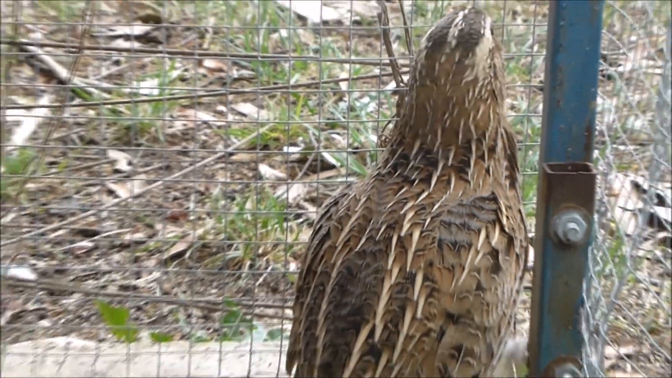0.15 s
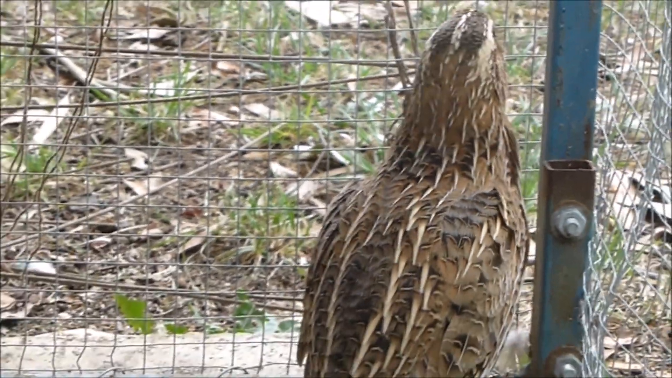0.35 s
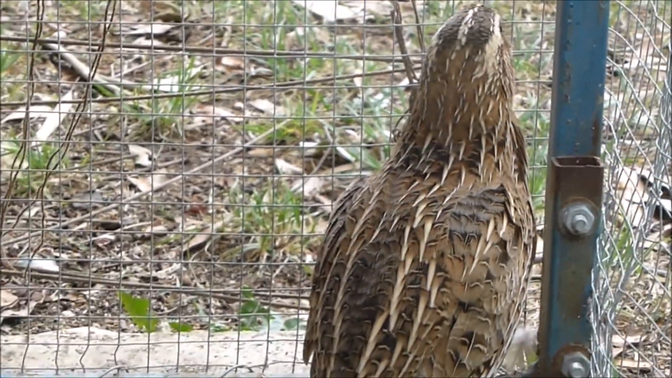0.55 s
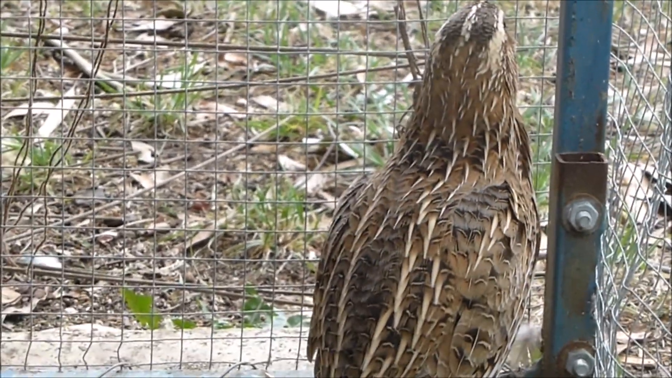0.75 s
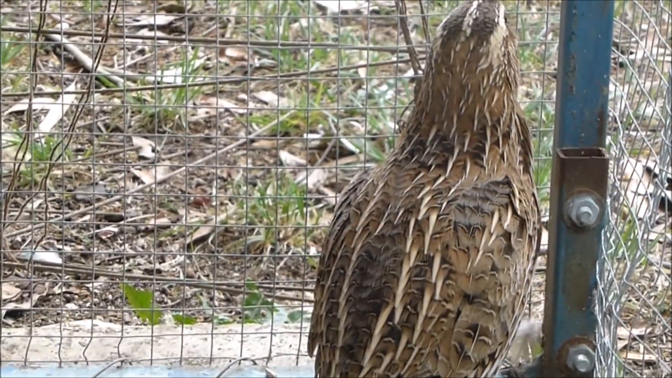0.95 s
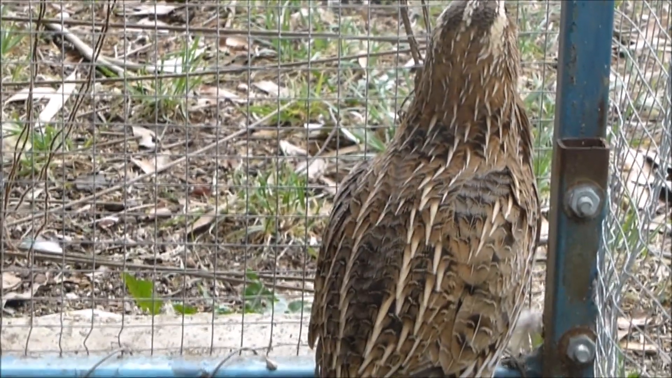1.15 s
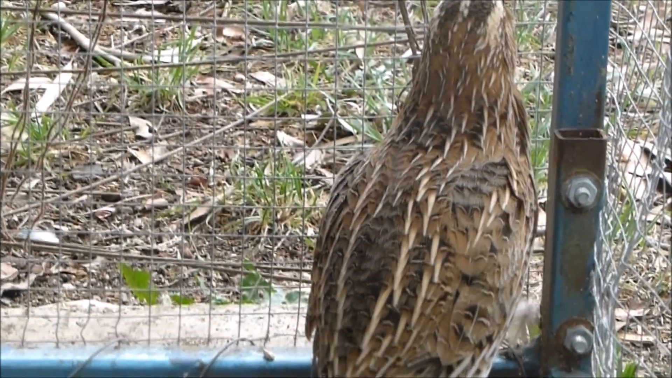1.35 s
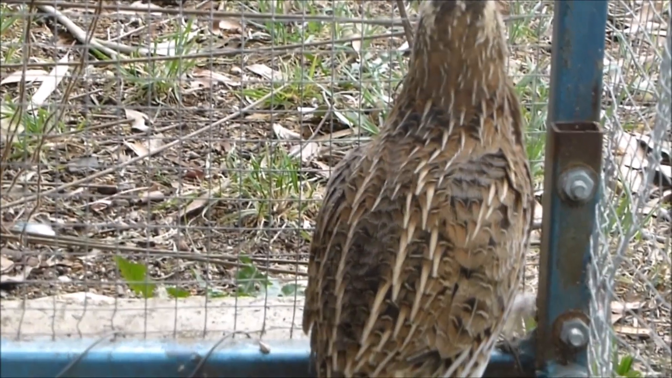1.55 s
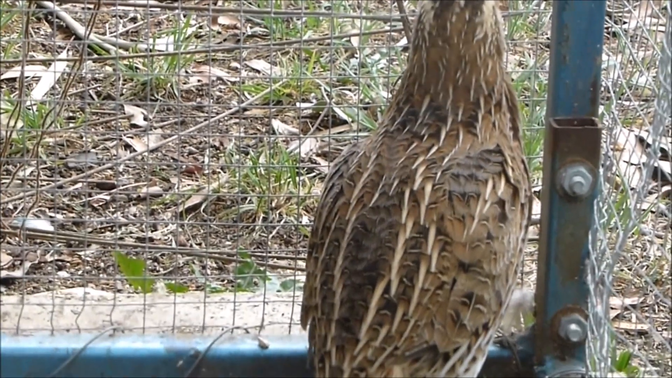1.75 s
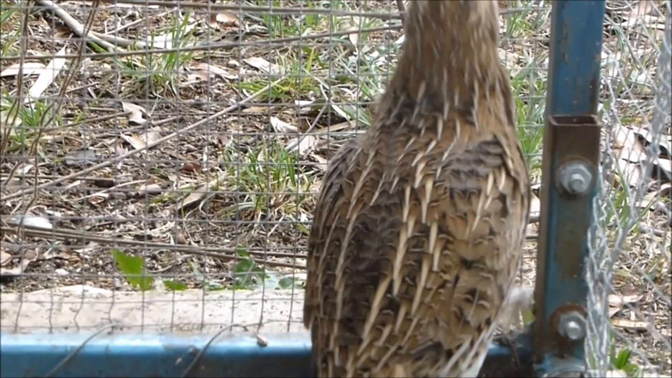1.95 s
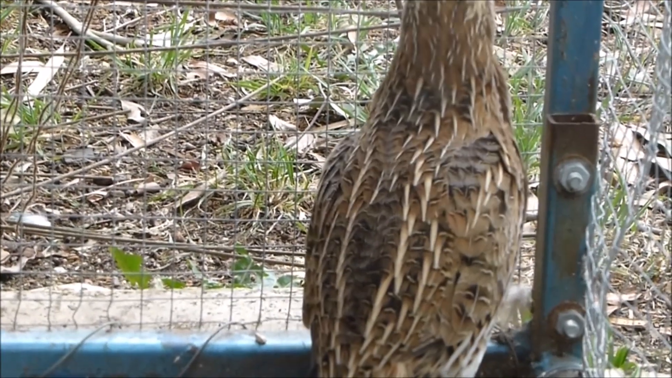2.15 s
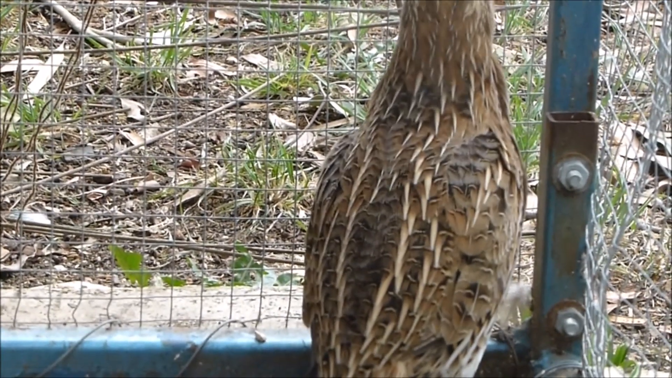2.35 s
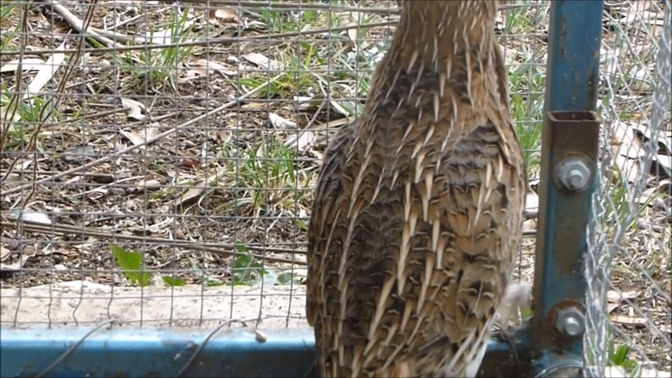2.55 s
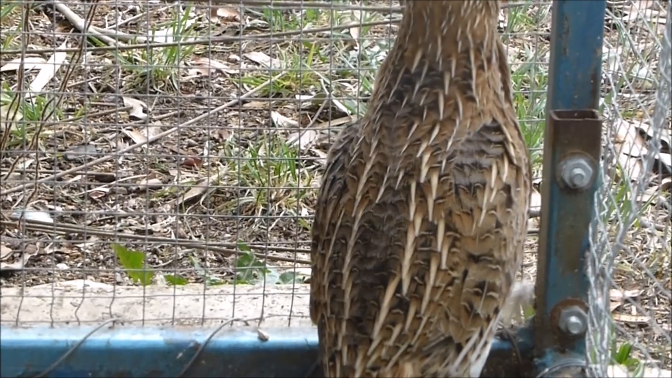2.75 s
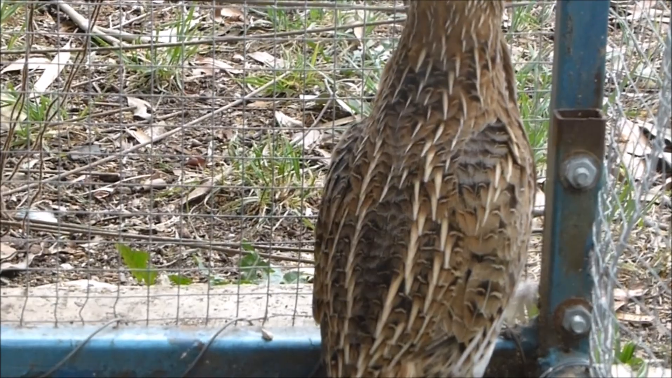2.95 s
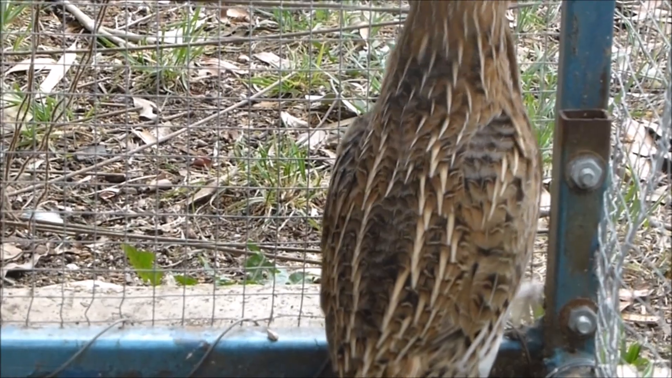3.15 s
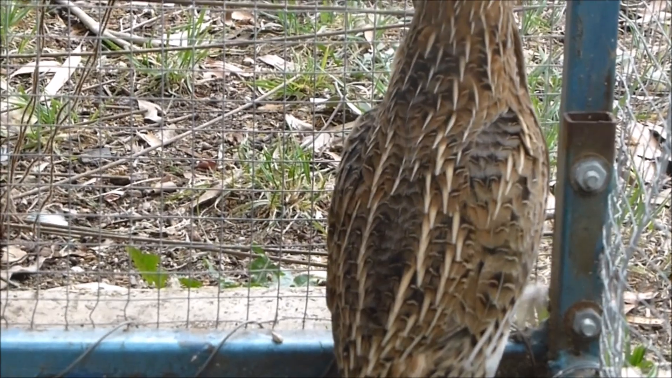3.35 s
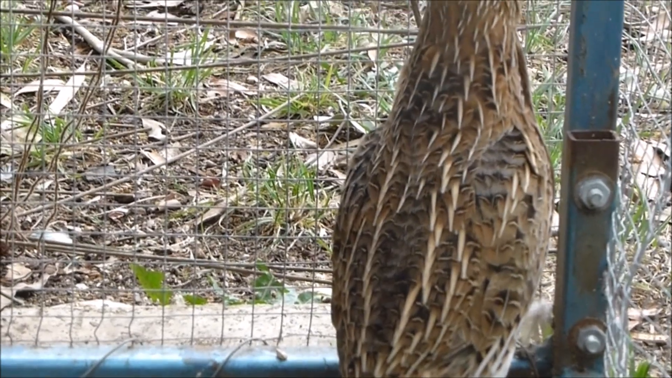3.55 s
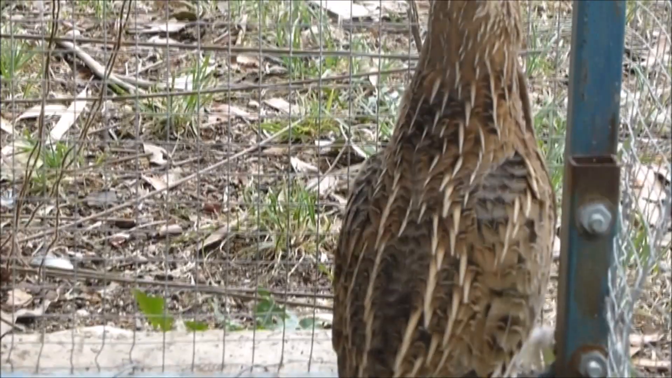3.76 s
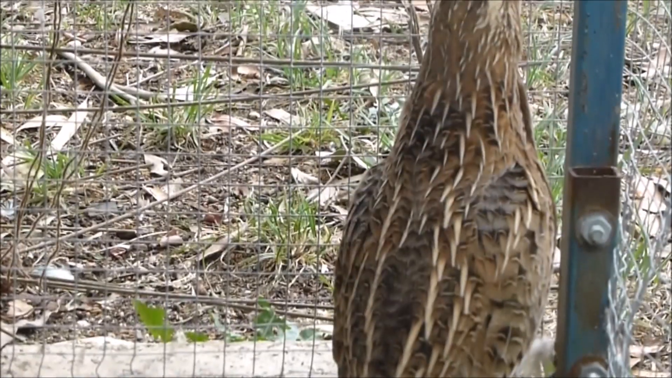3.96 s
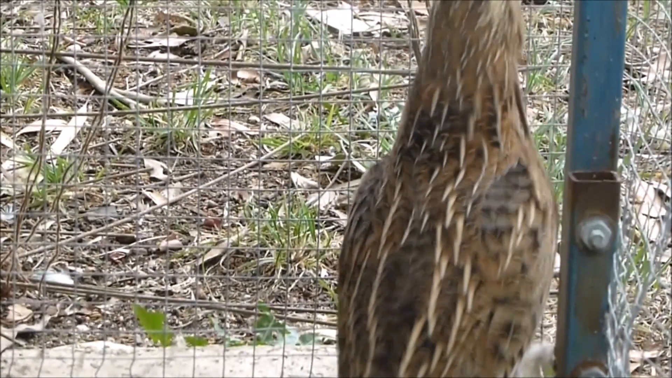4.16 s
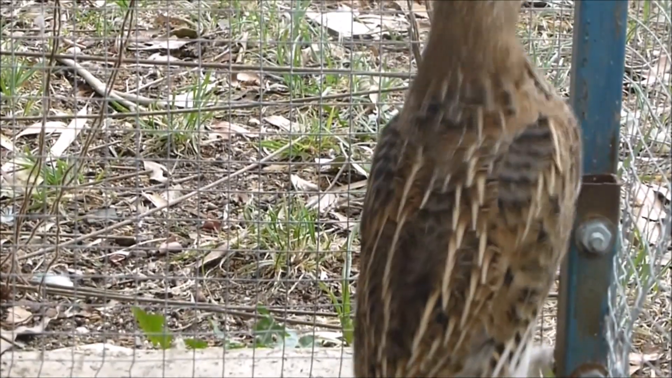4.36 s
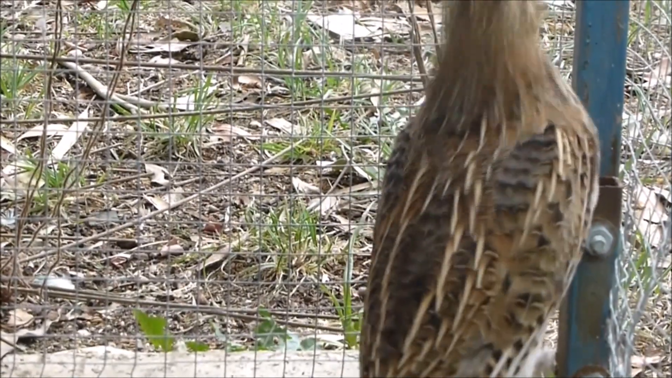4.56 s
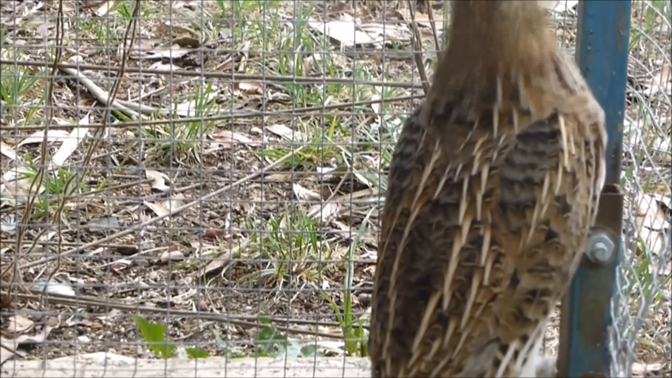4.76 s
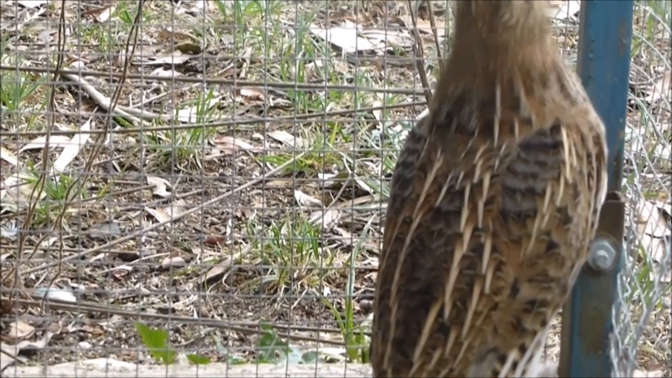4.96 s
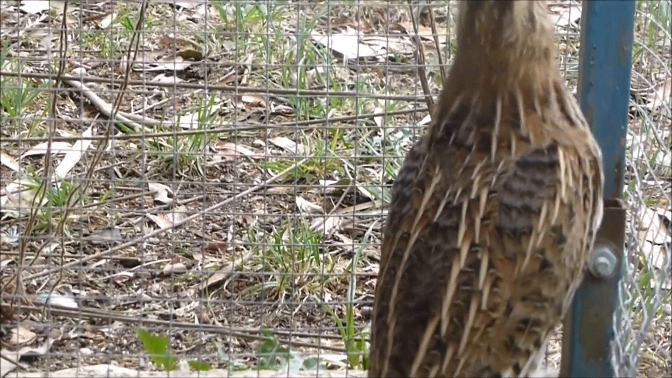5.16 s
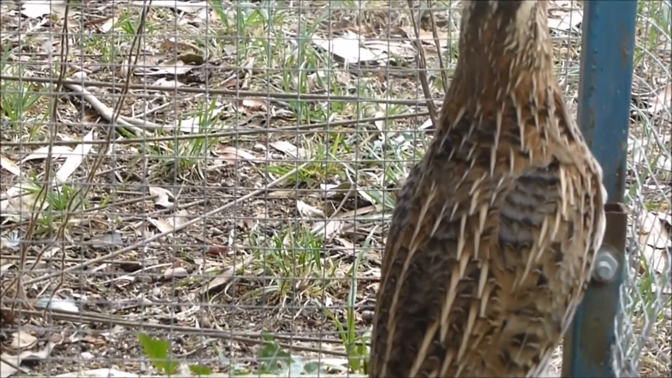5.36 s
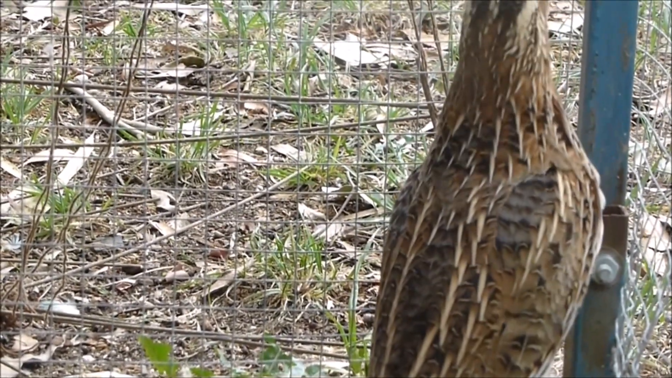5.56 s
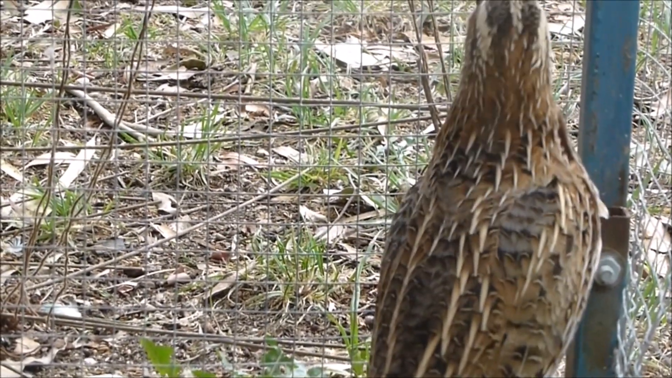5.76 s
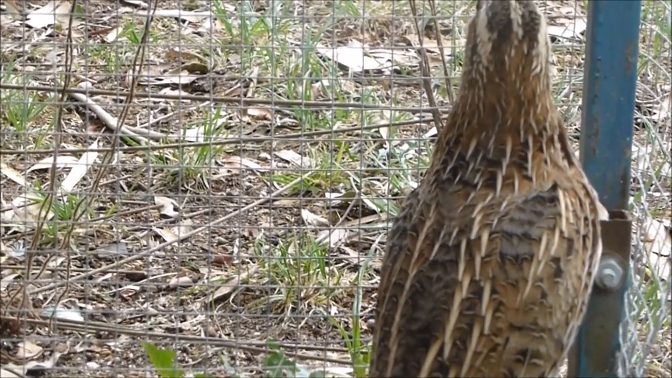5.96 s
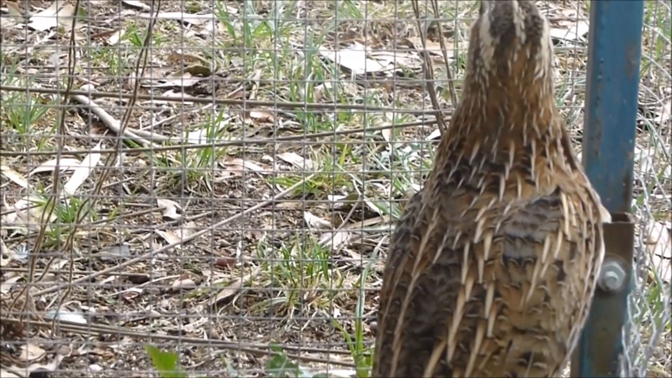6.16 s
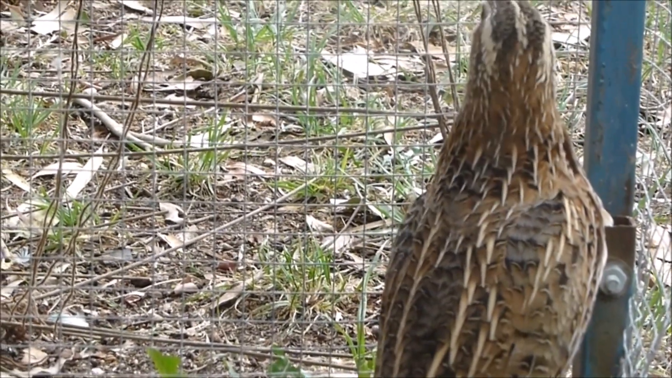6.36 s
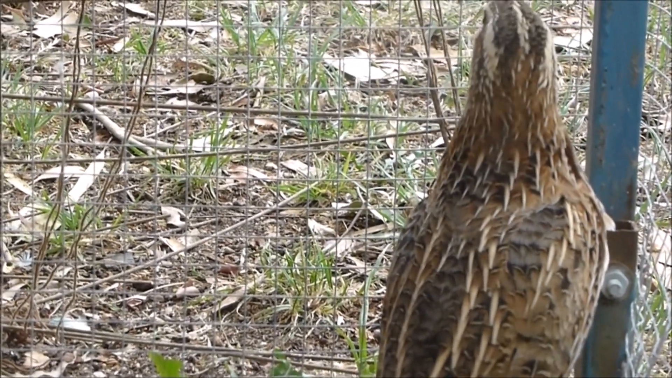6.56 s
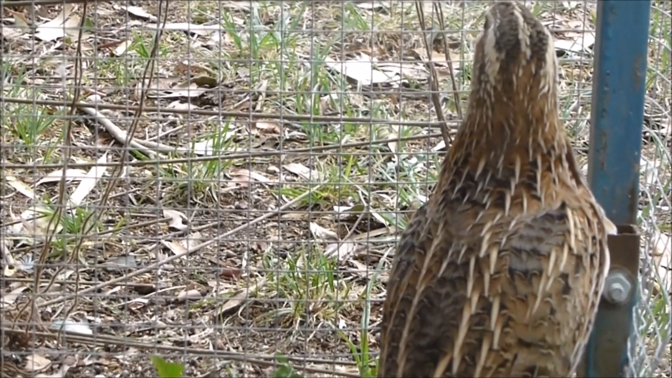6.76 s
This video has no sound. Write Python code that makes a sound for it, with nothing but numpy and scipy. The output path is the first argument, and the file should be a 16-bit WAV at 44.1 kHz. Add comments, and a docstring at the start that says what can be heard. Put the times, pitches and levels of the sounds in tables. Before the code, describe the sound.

A thin squeaky whistle from a nearby quail, slightly left, opens the scene. Small taps and clicks of wire and litter dot a calm yard with distant chirps and soft air noise. Past the middle, the bird gives a short croaky whistled note, then a harsh trilling crow full of rattle and hiss. Close reflections tangle the call; the background drops, then slowly returns, with a final knock.

```python
"""An outdoor wire pen, a male quail close to the microphone: a short high squeal, later a sharp note and a loud crow.
In the crow a whistle swings up and down, mostly 21 to 25 times a second, while slack membranes rattle against it.
Light taps, ticks and bumps sound in the pen as decaying tones and noise; far birds are narrow bands of noise.
Rumble and leaf hiss are shaped noise. Gain control turns everything down after loud passages, then recovers."""
import sys
import numpy as np
from scipy import signal
from scipy.fft import rfft, irfft
from scipy.io import wavfile
from scipy.ndimage import uniform_filter1d, minimum_filter1d, map_coordinates

SR = 44100
rng = np.random.default_rng(int(sys.argv[2]) if len(sys.argv) > 2 else 0)


def store_pcm(level_fs):
    """Save levels as 16-bit WAV."""
    pcm = np.round(np.clip(level_fs, -1, 1) * 32767).astype(np.int16)
    wavfile.write(sys.argv[1], SR, np.atleast_2d(pcm).T)


N = 299880


def amp(db):
    """Decibels to gain."""
    return 10 ** (np.asarray(db) / 20)


def unit(x):
    """Scale to rms 1."""
    return x / np.sqrt(np.mean(x ** 2) + 1e-20)


def along(points, hz):
    """(Hz, value) points read on a log frequency axis."""
    point_hz, value = np.transpose(points)
    return np.interp(np.log(hz + 1), np.log(point_hz + 1), value)


def curves(rows):
    """Sample times over the rows' span, then each column at those times."""
    s, *columns = np.transpose(rows)
    t = np.arange(round(s[0] * SR), round(s[-1] * SR)) / SR
    return [t] + [np.interp(t, s, column) for column in columns]


def ramp(t, length):
    """Rises from 0 to 1 over length seconds."""
    return np.clip(t / length, 0, 1)


def add(track, s, x):
    """Mix x into the track from time s on."""
    part = track[max(round(s * SR), 0):][:len(x)]
    part += x[:len(part)]


def placed(x, left_db):
    """Stereo pair, louder on the left by left_db."""
    return x * amp([[left_db / 2], [-left_db / 2]])


def wobble(rate, size):
    """A smooth random curve, rate knots a second."""
    knots = rng.standard_normal(size=4096)
    return map_coordinates(knots, [np.arange(size) * rate / SR], mode="wrap")


def colour(x, points, size=4096):
    """Causal minimum-phase filter with the gain of the (Hz, dB) points."""
    gain = amp(along(points, np.fft.rfftfreq(size, 1 / SR)))
    cepstrum = irfft(np.log(gain))
    fold = 1 + np.sign(size / 2 - np.arange(size))  # moves the cepstrum to positive times
    fold[0] = 1
    response = irfft(np.exp(rfft(cepstrum * fold)))
    return signal.fftconvolve(x, response)[:len(x)]


def band(size, lo_hz, hi_hz):
    """Noise of rms 1 between two soft edges."""
    edges = np.clip([lo_hz, hi_hz], 20, SR / 2 - 20)
    sos = signal.butter(2, edges, "band", fs=SR, output="sos")
    return unit(signal.sosfilt(sos, rng.standard_normal(size)))


def above(x, low_hz, order):
    """High-pass filter."""
    return signal.sosfilt(signal.butter(order, low_hz, "high", fs=SR, output="sos"), x)


# Likeness of the air at left and right. Each row: frequency in Hz, correlation from 0 to 1.
ALIKE = [(30, 0.59), (80, 0.86), (500, 0.78), (1500, 0.073), (5000, 0.3), (15000, 0.55)]


def air(spectrum, patchy_db):
    """Stereo noise of rms 1 with patches of random gain in time and frequency."""
    z = signal.stft(rng.standard_normal((2, N)), nperseg=2048)[2]
    hz = np.linspace(0, SR / 2, z.shape[1])
    patches = uniform_filter1d(rng.standard_normal(z.shape[1:]), size=16, axis=0)
    patches = uniform_filter1d(patches, size=5, axis=1)
    turn = np.arccos(np.clip(along(ALIKE, hz), -1, 1)) / 2  # splits the power between mid and side
    shape = amp(along(spectrum, hz)) * np.array([np.cos(turn), np.sin(turn)])
    z = z * shape[..., None] * amp(patchy_db * unit(patches))
    mid, side = signal.istft(z)[1][:, :N]
    return unit(np.array([mid + side, mid - side]))


# The open air over time. Each row: time in seconds, rumble and leaf hiss in relative dB.
OUTDOORS = [(0, -59, -59.5), (.45, -55.5, -62), (.95, -59, -64), (2.3, -58, -63), (3.601, -55.5, -60.5),
            (4.4, -57.5, -60.5), (5.6, -58.5, -64), (6.8, -59.5, -63)]
# Spectrum of the distant rumble. Each row: frequency in Hz, relative density in dB per Hz.
RUMBLE = [(15, -57.5), (25, -31.5), (54, -25.5), (90, -10.5), (338, -1.5), (383, -6), (461, 0.5),
          (522, -7.5), (1030, -7), (1150, -12), (2570, -20), (2850, -20), (3500, -30), (4550, -65),
          (7700, -120)]
# Spectrum of the leaf hiss. Each row: frequency in Hz, relative density in dB per Hz.
LEAVES = [(1760, -31), (3000, -5), (3240, -10), (4050, -1.5), (6270, -2), (9920, -3.5), (14000, -10),
          (15800, -19)]


def outdoors(rumble_db=4.0, leaves_db=2):
    """Distant rumble and a faint hiss of leaves: broad noise whose two levels drift slowly."""
    s, low_db, high_db = np.transpose(OUTDOORS)
    t = np.arange(N) / SR
    rumble = amp(np.interp(t, s, low_db) + rumble_db) * air(RUMBLE, patchy_db=2.0)
    leaves = amp(np.interp(t, s, high_db) + leaves_db) * air(LEAVES, patchy_db=1.0)
    return rumble + leaves


# Small birds far off. Each row: start in seconds, nominal length in seconds, pitch in Hz, level in dB.
FAR_BIRDS = [(.03, .09, 4100, -57), (1.13, .18, 2870, -65), (1.67, .04, 4000, -68), (1.9, .4, 2780, -71),
             (2.96, .2, 3380, -55), (2.92, .25, 2650, -62), (5.66, .2, 3050, -65), (6.03, .16, 3050, -65),
             (6.44, .15, 3570, -57), (6.42, .18, 2650, -66)]


def far_birds(width=0.029, t60=0.57):
    """Distant whistles, smeared into narrow bands that linger among the trees."""
    out, t = np.zeros(N), np.arange(SR // 2) / SR
    for s, length, hz, db in FAR_BIRDS:
        rise = np.minimum(1, 3 * t / length)
        fall = amp(-60 * np.maximum(t - length / 2, 0) / t60)
        add(out, s, amp(db) * rise * fall * band(len(t), hz * (1 - width), hz * (1 + width)))
    return out


# How long the yard rings. Each row: frequency in Hz, time to fall by 60 dB in seconds.
YARD = [(300, .45), (1600, .38), (3000, .44), (6000, .22), (14000, .15)]


def yard(x, near_db=-9.5, far_db=-22, near_t60=0.1):
    """Quick reflections from ground and pen, then a weak tail from the yard, both as decaying noise."""
    hz, t, z = signal.stft(rng.standard_normal((2, SR // 2)), SR, nperseg=256)
    tail = signal.istft(z * amp(-60 * t / along(YARD, hz)[:, None]))[1]
    t = np.arange(tail.shape[1]) / SR
    near = rng.standard_normal(tail.shape) * amp(-60 * t / near_t60) * (t > .002)
    answer = amp(near_db) * near / np.linalg.norm(near[0])
    answer = answer + amp(far_db) * tail / np.linalg.norm(tail[0])
    return signal.fftconvolve(x, answer, axes=1)[:, :N]


# Soft knocks in the pen. Each row: start in seconds, level in dB, pitch in Hz,
# time to fall by 60 dB in seconds, click in dB relative to the knock.
BUMPS = [(.266, -36, 150, .04, -40), (.348, -42, 400, .2, -30), (1.402, -38, 500, .1, -25),
         (3.738, -47, 130, .08, -40), (6.776, -26, 240, .03, -5)]


def bumps(low_hz=100):
    """Soft, well damped knocks, some with a click at the contact."""
    out, t = np.zeros(N), np.arange(SR // 4) / SR
    for s, db, hz, t60, click_db in BUMPS:
        thud = amp(-60 * t / t60) * np.sin(2 * np.pi * hz * t + .8 * wobble(150, len(t)))
        thud = thud * (1 - np.exp(-t / 0.00009))
        click = amp(click_db - 60 * t / 0.0035) * band(len(t), 240, 7700)
        add(out, s, amp(db) * (thud + click))
    return above(out, low_hz, order=2)


# Ticks of wire and dry litter. Each row: start in seconds, relative level in dB, nominal centre in Hz.
TICKS = [(0.4744, -49, 3300), (0.652, -43, 4720), (0.6998, -52, 5500), (0.8844, -45, 5500),
         (1.397, -44.5, 7960), (2.502, -46, 4900), (3.483, -38, 5500), (3.5079, -37, 9400),
         (3.977, -44.5, 7560), (4.556, -34, 4240)]


def ticks(tick_db=-6.0, t60=0.039):
    """Tiny dry clicks: short bands of noise that die at once."""
    out, t = np.zeros(N), np.arange(SR // 10) / SR
    for s, db, hz in TICKS:
        add(out, s, amp(db + tick_db - 60 * t / t60) * band(len(t), hz * 0.76, hz * 1.5))
    return out


# Taps on the pen. Each row: start in seconds, snap and ring of the frame in relative dB.
TAPS = [(2.723, -37.5, -45), (3.422, -32, -43), (4.1029, -35.5, -42)]
# Modes of the pen's frame. Each row: frequency in Hz, relative level in dB, time to fall by 60 dB in seconds.
FRAME = [(370, -4, 0.35), (1000, 3.5, 0.26), (1110, -0.5, .15), (1825, -18, 0.13), (2380, -31.5, .15)]


def taps(snap_db=-8, ring_db=1, snap_t60=0.1):
    """Each tap snaps and leaves the modes of the frame ringing briefly."""
    out, t = np.zeros(N), np.arange(SR // 3) / SR
    for s, db, frame_db in TAPS:
        ring = np.zeros(len(t))
        for hz, level, t60 in FRAME:
            ring += amp(level - 60 * t / t60) * np.sin(2 * np.pi * hz * t + 0.68 * wobble(160, len(t)))
        ring = ring * (1 - np.exp(-t / 0.0063))  # the ring builds up softly
        snap = amp(db + snap_db - 60 * t / snap_t60) * band(len(t), 1800, 13000)
        add(out, s, snap + amp(frame_db + ring_db) * ring)
    return out


# Reflections from floor, post and sides of the pen. Each row: delay in seconds, relative gain.
ECHOES = [(.00173, .26), (.00205, -.24), (.00298, .18), (.0063, .15), (.015, .17)]


def pen(x, strength):
    """Close surfaces repeat the call a few milliseconds late, so that its sweeps tangle and beat."""
    out = x.copy()
    for delay, gain in ECHOES:
        add(out, delay, strength * gain * x)
    return out


def syrinx(pitch, rough, overtones, flap_hz, depth, jitter):
    """A whistle; when rough, a slower uneven flapping chops it and its pitch shakes at random."""
    n = len(pitch)
    flap = np.sin(2 * np.pi * np.cumsum(flap_hz * (1 + .3 * wobble(300, n))) / SR)
    phase = 2 * np.pi * np.cumsum(pitch * (1 + jitter * rough * wobble(1100, n))) / SR
    chop = (1 + depth * rough * flap) / np.sqrt(1 + (depth * rough) ** 2 / 2)  # keeps the mean power
    return chop * unit(sum(amp(db) * np.sin(multiple * phase) for multiple, db in overtones))


def note(t, pitch, db, rough, overtones, air, air_db, flap_hz, depth, jitter):
    """One note of the quail, with air rushing past the beak, more of it when rough."""
    rush = amp(air_db) * np.sqrt(np.abs(rough)) * unit(colour(rng.standard_normal(len(t)), air))
    fade = np.minimum(1, np.minimum(t - t[0], t[-1] - t) / 0.0016)
    voice = syrinx(pitch, rough, overtones, flap_hz, depth, jitter)
    out = np.zeros(N)
    add(out, t[0], fade * amp(db) * (voice + rush))
    return out


# The high squeal. Each row: time in seconds, pitch before the cracks in Hz, relative level in dB,
# roughness from 0 to 1.
SQUEAL = [(.179, 2850, -50, 0.04), (.195, 2920, -28, 0.06), (.243, 2810, -29, 0.06),
          (.262, 2850, -30.5, 0.53), (.281, 2850, -32, 0), (.295, 2800, -32.5, 0.7), (.321, 2917, -26.5, 0),
          (.346, 3075, -22.5, 0.27), (.366, 3060, -44, 0)]
# Where the squeal cracks upward and sinks back. Each row: start in seconds, length in seconds.
CRACKS = [(.216, .025), (0.253, .042)]
# Overtones of the squeal. Each row: multiple of the pitch, relative level in dB.
SQUEAL_TONE = [(1, 2), (2, -14), (3, -19.5), (4, -33), (5, -41.5)]
# Air at the beak in the squeal. Each row: frequency in Hz, relative gain in dB.
SQUEAL_AIR = [(1000, -44), (2100, 5), (3500, 16), (4600, 0.5), (6500, -4.5), (9500, 1), (15000, -31)]


def squeal():
    """A thin whistle that cracks upward twice and swells near its end."""
    crack_hz, crack_db, crack_rise_s = 619, 3.5, 0.0026  # how far, how much louder, how fast
    t, pitch, db, rough = curves(SQUEAL)
    lift = sum(ramp(t - s, crack_rise_s) * (1 - ramp(t - s, length) ** 3) for s, length in CRACKS)
    return note(t, pitch + crack_hz * lift, db + crack_db * lift, rough, SQUEAL_TONE, SQUEAL_AIR,
                air_db=-11.5, flap_hz=860, depth=0.7, jitter=0.15)


# Soft gliding tones around the crow; the first is the sharp note ringing on, the others are faint whines.
# Each row: start in seconds, length in seconds, first and last pitch in Hz, relative level in dB,
# roughness from 0 to 1.
GLIDES = [(4.48, 0.088, 1610, 1543, -31.5, 0.33), (4.569, 0.051, 1450, 1532, -24.5, 0.09),
          (4.614, 0.08, 2250, 2420, -35, 0.39), (5.365, 0.036, 3110, 3260, -25.5, .08),
          (5.388, 0.062, 2328, 2810, -31.5, 0.5), (5.454, 0.036, 1810, 1760, -40, 0.2),
          (5.49, .08, 1356, 1634, -36, 0.31)]
# Overtones of the gliding tones. Each row: multiple of the pitch, relative level in dB.
GLIDE_TONE = [(1, 8), (2, -8), (3, -13), (4, -25), (5, -26.5)]
# Air at the beak in the gliding tones and the sharp note. Each row: frequency in Hz, relative gain in dB.
SHARP_HISS = [(600, -47.5), (1100, 7), (2800, 3.5), (3600, -8.5), (4600, -19.5), (6000, -5.5), (7400, -1.5),
              (8800, -15), (15000, -28)]


def glides():
    """Soft gliding tones around the crow: first the sharp note ringing on, then faint whines."""
    edge_s, edge_db, sag_db_per_s = 0.036, 12, 54  # each fades in and out, and sags throughout
    out = np.zeros(N)
    for s, length, first_hz, last_hz, db, rough in GLIDES:
        t = np.arange(round(length * SR)) / SR
        edge = ramp(np.minimum(t, length - t), edge_s) - 1
        level = db - sag_db_per_s * t + edge_db * edge
        pitch = first_hz + (last_hz - first_hz) * t / length
        out += note(s + t, pitch, level, rough, GLIDE_TONE, SHARP_HISS,
                    air_db=-8.0, flap_hz=371, depth=0.98, jitter=0.11)
    return out


# Overtones of the sharp note. Each row: multiple of the pitch, relative level in dB.
SHARP_TONE = [(1, 3), (2, -33), (3, -39), (4, -27.5), (5, -29)]


def sharp():
    """One push of air: a croak tightens into a clean tone at its height, then slackens as it fades."""
    start_s, attack_s, hold_s, release_s = 4.399, .014, .023, .084
    hold_db, range_db = -5.5, 37  # relative level in the hold; size of the rise and of the fall
    slack_hz, taut_hz, tighten_s, slacken_s = 1318, 1598, 0.0064, .018
    slack_rough, taut_rough = 1, 0.028  # the syrinx is clean only while taut
    release_at = attack_s + hold_s
    t = np.arange(round((release_at + release_s) * SR)) / SR
    push = ramp(t, attack_s) - 1 - ramp(t - release_at, release_s) ** 1.1
    taut = ramp(t - attack_s, tighten_s) - ramp(t - release_at, slacken_s)
    pitch = slack_hz + (taut_hz - slack_hz) * taut
    rough = slack_rough + (taut_rough - slack_rough) * taut
    croak = note(start_s + t, pitch, hold_db + range_db * push, rough, SHARP_TONE, SHARP_HISS,
                 air_db=-12.5, flap_hz=273.5, depth=1.2, jitter=0.03)
    return above(croak, low_hz=1020, order=6)  # the small beak radiates no bass


def rattle(size, rate_hz, scatter, spread_db):
    """Uneven slaps of the slack membranes: pulses of random spacing and strength."""
    turns = np.cumsum(rate_hz * np.exp(scatter * wobble(600, size))) / SR
    slaps = np.diff(np.floor(turns), prepend=0)
    return unit(slaps * amp(spread_db * wobble(700, size)))


# The force of the crow. Each row: time in seconds, whistle and rattle in relative dB.
CROW = [(4.676, -27, -43), (4.681, -3.5, -21.5), (4.707, -3.5, -0.5), (4.73, -2.5, -12), (4.835, -9, -17),
        (4.9, -3, -12.5), (5.1, -5.5, -9.5), (5.3, -9.5, -19), (5.32, -16.5, -26.5), (5.365, -21, -21.5),
        (5.385, -36.5, -41.5)]
# How fast the whistle swings. Each row: time in seconds, swings a second.
SWING_RATE = [(4.676, 22), (4.78, 25), (4.85, 21.2), (5.16, 24.3), (5.29, 21.5), (5.385, 15)]
# Overtones of the crow. Each row: multiple of the pitch, relative level in dB.
CROW_TONE = [(1, 3.5), (2, -22.5), (3, -40.5), (4, -36), (5, -33)]
# What the throat does to the whistle. Each row: frequency in Hz, gain in dB.
THROAT = [(400, -51.5), (800, -24), (1050, -3.5), (1330, -14.5), (1470, -3), (1600, -8), (1850, 0),
          (2400, -8.5), (2900, -16.5), (3700, -14.5), (4400, -25), (6000, -20), (15000, -30)]
# What the throat does to the rattle. Each row: frequency in Hz, relative gain in dB.
RATTLE = [(300, -41.5), (600, -34), (850, -8), (1080, 1), (1350, 8), (1470, 2), (1620, -3.5), (2600, -5),
          (3700, -8.5), (4300, -15), (5500, -23), (7500, -24.5), (11000, -32), (15500, -43)]
# Air at the beak in the crow. Each row: frequency in Hz, relative gain in dB.
HISS = [(2500, -34), (3600, 1), (4400, -4), (5500, 8), (7500, -12), (11000, -17), (15500, -20.5)]


def crow(top_hz=3850, crest_db=2.0, hiss_db=-3, hiss_swing_db=14):
    """The whistle swings through the throat's resonance, flaring as it climbs; the rattle runs underneath."""
    swing_start = .27  # share of a swing already past when the crow begins
    bottom_hz, scoop_hz, scoop_s = 1621, 420.8, .032  # bottom of a swing, reached from below
    tire_after_s, climb_hz_per_s = .35, 2400  # late in the crow the bottom climbs
    start_rough, rough_per_s = .13, 1.004  # the voice frays as it goes on
    push_db, push_fade_s = 5, 1  # upswings are pushed harder, less so as the breath runs out
    crest_dip_db = 2  # the whistle thins at the top of a swing
    t, whistle_db, rattle_db = curves(CROW)
    n, age = len(t), t - t[0]

    turns = np.cumsum(np.interp(t, *np.transpose(SWING_RATE))) / SR
    swing = 2 * np.pi * (swing_start + turns)
    tension = ((1 + np.cos(swing)) / 2) ** (3 / 2)  # wide troughs, narrow crests
    low_hz = bottom_hz - scoop_hz * (1 - ramp(age, scoop_s))
    low_hz = low_hz + climb_hz_per_s * np.maximum(age - tire_after_s, 0)
    high_hz = top_hz * np.minimum(1, 1700 / low_hz) ** 0.55  # the swings narrow as the crow runs out
    waver = .035 * wobble(130, n)
    pitch = low_hz * (high_hz / low_hz) ** tension * (1 + waver)

    rough = start_rough + rough_per_s * age + .55 * tension + .2 * np.sin(swing)
    whistle = syrinx(pitch, np.clip(rough, 0, 1), CROW_TONE, flap_hz=430, depth=1.3, jitter=.12)
    push = -push_db * (1 - ramp(age, push_fade_s)) * np.sin(swing)
    whistle = whistle * amp(whistle_db + push - crest_dip_db * tension + 2.8 * wobble(150.3, n))

    slaps = rattle(n, rate_hz=520, scatter=.36, spread_db=5.5) + 0.73 * rng.standard_normal(n)
    rasp = amp(crest_db * (tension - 4.0)) * unit(colour(slaps, RATTLE))
    # each slap lets through a puff of air, strongest at the crests
    puffs = np.sqrt(np.abs(uniform_filter1d(slaps ** 2, size=40))) * rng.standard_normal(n)
    hiss = amp(hiss_db + hiss_swing_db * (tension - 2)) * unit(colour(puffs, HISS))
    out = np.zeros(N)
    add(out, t[0], colour(whistle, THROAT) + amp(rattle_db) * (rasp + hiss))
    return out


def quail():
    """All the bird's calls with the pen's echoes, left of centre and furthest left in the squeal."""
    first = placed(pen(squeal(), strength=1.6), left_db=7.5)
    later = placed(pen(sharp() + glides() + crow(), strength=0.57), left_db=1.8)
    return first + later


def scene():
    """The bird and the small sounds of the pen, in the open air."""
    close = quail() + placed(taps() + ticks() + bumps(), left_db=3.5)
    return close + yard(close) + far_birds() + outdoors()


def record(dry, ceiling_db=-9.5, release_db=6, full_scale=0.7):
    """Gain control ducks loud passages and recovers by release_db a second; then peak limiter and band limit."""
    top_hz = 15830
    power = np.abs(uniform_filter1d(np.mean(dry ** 2, axis=0), size=1300))
    over = np.maximum(10 * np.log10(power + 1e-12) - ceiling_db, 0)
    recovery = release_db * np.arange(N) / SR
    ducked = dry * amp(recovery - np.maximum.accumulate(over + recovery))
    needed = full_scale / np.maximum(np.abs(ducked).max(axis=0), full_scale)
    limited = ducked * uniform_filter1d(minimum_filter1d(needed, size=131), size=131)
    return irfft(rfft(limited) * (np.fft.rfftfreq(N, 1 / SR) < top_hz), N)


dry = scene()
out = record(dry)
store_pcm(out)
```